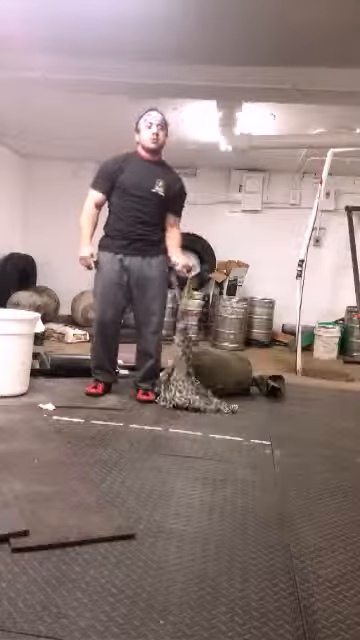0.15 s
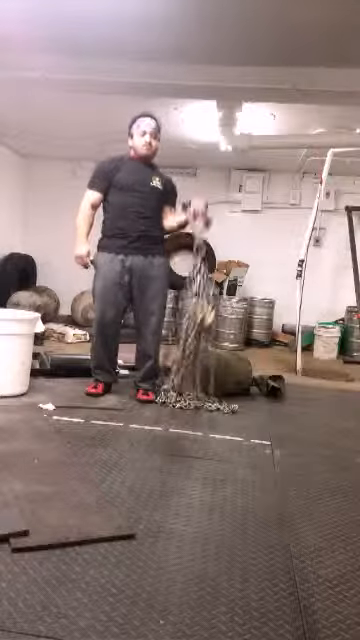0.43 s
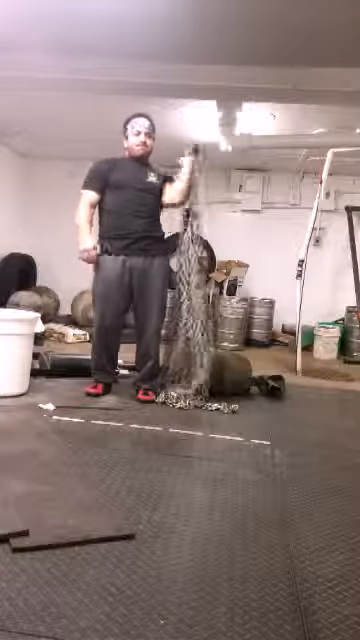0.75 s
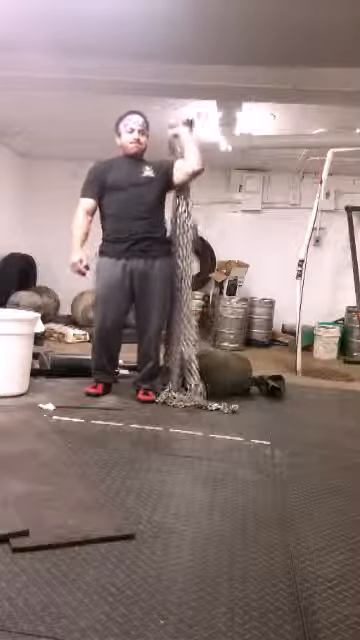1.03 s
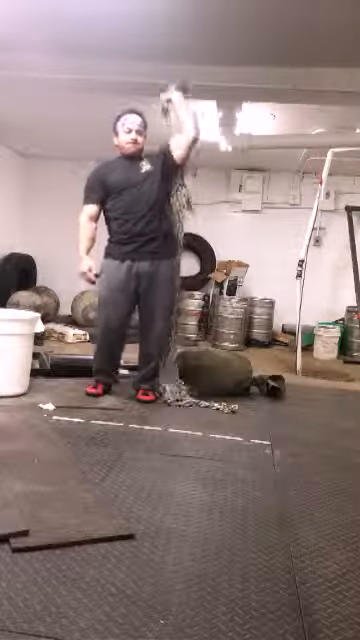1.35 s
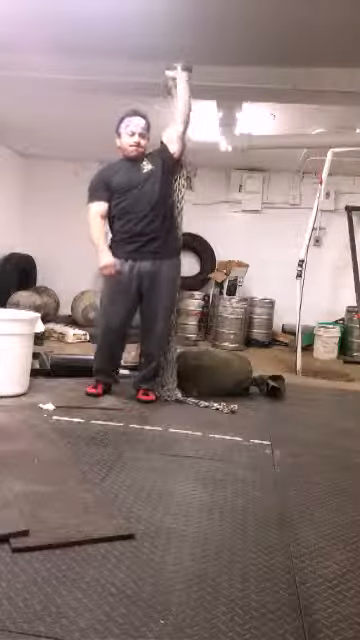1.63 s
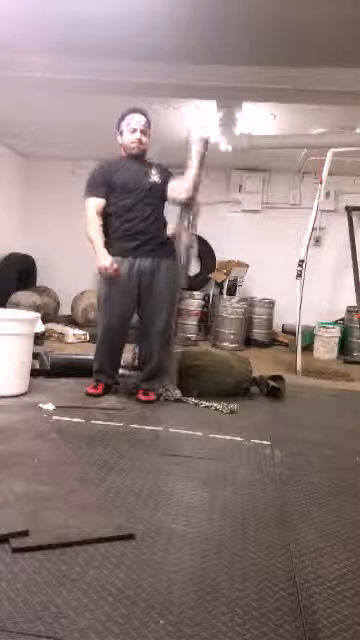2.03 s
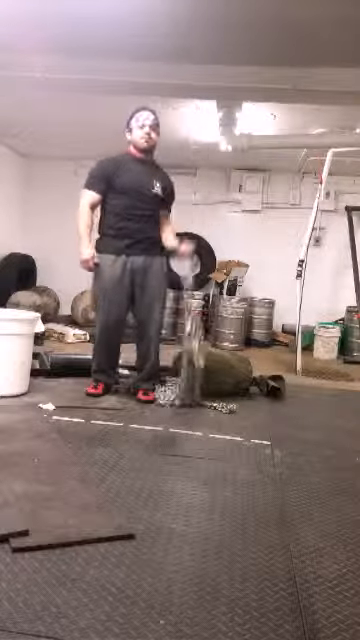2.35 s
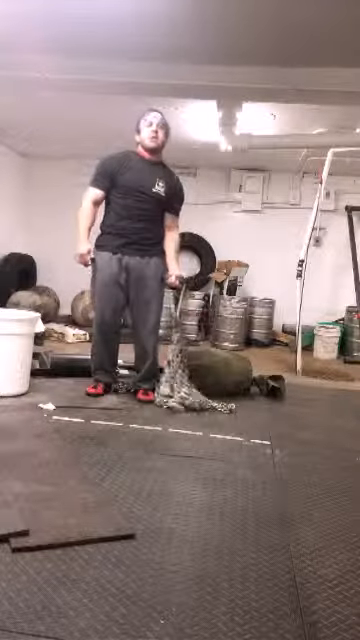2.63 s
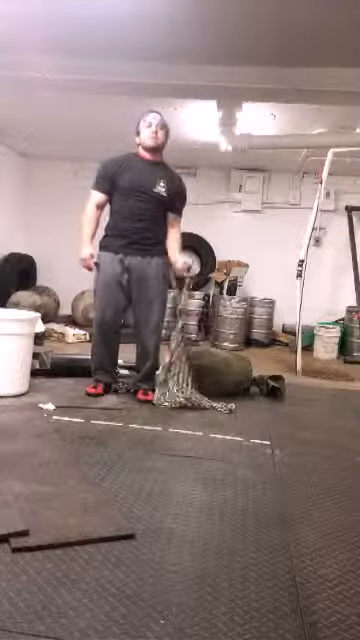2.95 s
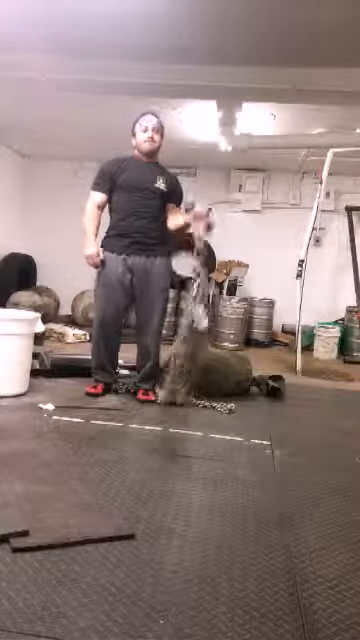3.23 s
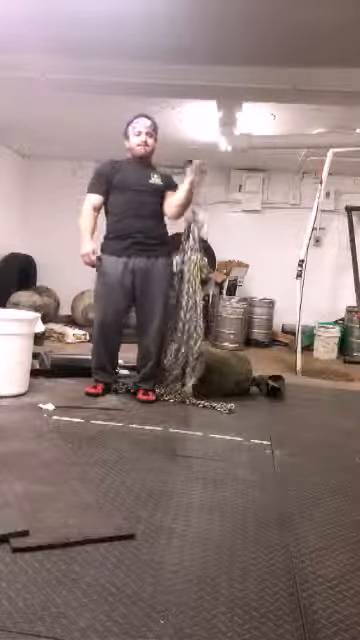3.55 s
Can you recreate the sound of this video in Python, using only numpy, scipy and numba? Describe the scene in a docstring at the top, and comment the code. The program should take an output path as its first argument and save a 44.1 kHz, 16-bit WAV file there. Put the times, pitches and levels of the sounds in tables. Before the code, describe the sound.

A thick bundle of chain links spills onto a rubber floor, falls nearly quiet, jingles loosely as it rises, drops back in a bright metallic crash, settles, and rattles once more in a low, hard-walled room.

```python
"""In a low, bare gym with a rubber floor, a bundle of heavy steel chains drops onto its pile, is lifted off,
shaken overhead and let down again; a short last rattle follows. Hundreds of link collisions a second each
give a dry tick and a high ring, with dull knocks from further impacts; strands slap and a few links snap.
The bundle lands with a low clang of decaying sines. The stereo pickup takes each source close or distant
by its share of the room's tail; the recorder softens quiet passages and cuts the extreme treble."""
import sys
import numpy as np
from scipy import signal
from scipy.fft import rfft, irfft, next_fast_len
from scipy.io import wavfile
from scipy.ndimage import uniform_filter1d
from numba import njit

SR = 44100
rng = np.random.default_rng(int(sys.argv[2]) if len(sys.argv) > 2 else 0)


def inscribe(sig):
    """Save sig as 16-bit PCM at rate SR to the path in sys.argv[1].

    A 1-D sig is mono; a 2-D sig holds one channel per row.
    Samples are clipped to [-1, 1] before scaling.
    """
    pcm = np.round(np.clip(np.atleast_2d(sig).T, -1, 1) * 32767)
    wavfile.write(sys.argv[1], SR, pcm.astype(np.int16))


N = 163170
T = np.arange(N) / SR
LINKS = 120  # different links to draw from
MAX_HITS = 20000
LN_60_DB = np.log(1000)  # a t60 is the time to fall by 60 dB


def undb(db):
    """Decibels to gain."""
    return 10 ** (np.asarray(db) / 20)


def unit(x):
    """Scale to rms 1."""
    return x / np.sqrt(np.mean(x ** 2))


def lookup(table, hz):
    """Read (f/Hz, value) points on a log-frequency axis."""
    f, value = np.array(table, float).T
    return np.interp(np.log(hz + 1e-9), np.log(f), value)


def colour(x, table):
    """Filter by (f/Hz, level/dB) points, without phase shift."""
    size = next_fast_len(N + 8192, True)
    gain = undb(lookup(table, np.fft.rfftfreq(size, 1 / SR)))
    return irfft(rfft(x, size) * gain, size)[..., :N]


def convolve(x, response):
    """Play x through a stereo response."""
    return signal.fftconvolve(np.atleast_2d(x), response, axes=-1)[:, :N]


def in_room(x, room, wet_db):
    """Direct sound plus reverberation at constant power; a higher wet_db sounds more distant."""
    wet = undb(wet_db)
    return (x + wet * convolve(x, room)) / np.hypot(1, wet)


def place(x, table):
    """Share the sound between left and right by (f/Hz, left minus right level/dB) points."""
    left = colour(x[0], [(hz, db / 2) for hz, db in table])
    right = colour(x[1], [(hz, -db / 2) for hz, db in table])
    return np.array([left, right])


def level_curve(times, db):
    """Gain that moves between dB points, and is silent outside them."""
    return undb(np.interp(T, times, db, left=-120, right=-120))


def effort(moves):
    """Gains of ring, tick and knock, summed over a list of movements."""
    tables = [np.array(move) for move in moves]
    return [sum(level_curve(m[:, 0], m[:, column]) for m in tables) for column in (1, 2, 3)]


def collisions(per_s, scatter_db):
    """Impacts at random times with scattered force, as rows (sample, force, which link 0-1)."""
    draws = rng.random((MAX_HITS, 3))
    times = np.cumsum(-np.log(1 - draws[:, 0])) / per_s
    force = undb(scatter_db * np.minimum(-np.log(1 - draws[:, 1]), np.pi))
    return np.column_stack([times * SR, force, draws[:, 2]])[times < N / SR]


# tick gain, before its trim, at which all links collide; least share that collides in quiet passages
BUSY_DB, IDLE_SHARE = -30, 0.32


def thinned(hits, gain):
    """As the chain slows, fewer links collide, and each stands out more."""
    gain_at_hit = gain[hits[:, 0].astype(int)]
    share = np.clip(np.sqrt(gain_at_hit / undb(BUSY_DB)), IDLE_SHARE, 1)
    kept = rng.random(MAX_HITS)[:len(hits)] < share
    return np.column_stack([hits[:, 0], hits[:, 1] / np.sqrt(share), hits[:, 2]])[kept]


@njit
def strike(hits, responses):
    """Every impact plays the stereo response of its link, scaled by its force."""
    out = np.zeros((2, N + responses.shape[2]))
    for start, force, link in hits:
        for c in range(2):
            response = responses[int(link * len(responses)), c]
            part = out[c, int(start):]
            for i in range(len(response)):
                part[i] += force * response[i]
    return out[:, :N]


CONTACT_RISE_S = 0.00034  # links slide into contact


def crack(hits, decay_s):
    """Each impact is a short noise burst whose shape differs from link to link and side to side."""
    t = T[:1024]
    envelope = np.exp(-t / decay_s) * (1 - np.exp(-t / CONTACT_RISE_S))
    return unit(strike(hits, rng.standard_normal((LINKS, 2, len(t))) * envelope))


def clink(hits, t60, count):
    """Touching links ring briefly at scattered pitches, mostly below the high ring."""
    t = T[:4096]
    hz = rng.uniform(1800, 12000, (count, LINKS, 1, 1))
    cycles = hz * t + rng.random((count, LINKS, 2, 1))
    tones = np.sin(2 * np.pi * cycles).sum(axis=0)
    return unit(strike(hits, tones * np.exp(-LN_60_DB * t / t60)))


# ringing modes of a link: f/Hz
LINK_HZ = [12910, 13340, 13790, 14110, 14430, 15130]
# the same modes: spread between links f/Hz, relative level/dB, t60 t/s at a damping of 1
LINK_MODES = [(34, -4, 0.1), (99, -0.5, 0.043), (66.6, -3, 0.078), (98, -3, 0.026), (99, -0.5, 0.063),
              (122, -11.5, 0.042)]
RING_ATTACK_S = 0.00052


def ring(hits, damping):
    """Each link rings on its own slightly shifted set of modes; damping scales the rate of decay."""
    t, responses = T[:3072], 0
    attack = 1 - np.exp(-t / RING_ATTACK_S)
    for hz, (spread, db, t60) in zip(LINK_HZ, LINK_MODES):
        own_hz = hz + spread * rng.standard_normal((LINKS, 1, 1))
        decay = np.exp(-LN_60_DB * t * damping / t60)
        envelope = undb(db) / np.sqrt(t60) * decay * attack
        cycles = own_hz * t + rng.random((LINKS, 2, 1))
        responses = responses + envelope * np.sin(2 * np.pi * cycles)
    return unit(strike(hits, responses))


# reverberation: f/Hz, t60 t/s
ROOM_T60 = [(60, 0.16), (200, 0.44), (550, 0.89), (1400, 0.3), (4000, 1), (6000, 0.69), (8500, 0.39),
            (14000, 0.32)]
ROOM_ONSET_S = .005  # gap before the tail


def room_response():
    """A diffuse stereo tail of noise bands, longest around 550 Hz and 4 kHz."""
    t, hz, out = T[:SR], np.arange(SR // 2 + 1), 0
    noise = rfft(rng.standard_normal((2, SR)))
    for f, t60 in ROOM_T60:
        share = lookup([(g, float(g == f)) for g, _ in ROOM_T60], hz)
        decay = np.exp(-LN_60_DB * t / t60)
        out = out + irfft(noise * share, SR) * decay * np.sqrt(2 * LN_60_DB / t60 / SR)
    return out * (t > ROOM_ONSET_S)


# colour of the room air: f/Hz, relative level/dB
AIR_COLOUR = [(60, -4), (200, 4), (600, -1), (1500, -15.5), (5000, -9), (14000, -29.5)]
AIR_DB = -84


def room_air():
    """Faint steady noise of the bare room."""
    return undb(AIR_DB) * unit(colour(rng.standard_normal((2, N)), AIR_COLOUR))


# links pour onto the pile and settle: t/s, then ring, tick and knock level/dB before trims
POURS = [
    [(-.01, -4, -10.5, -23.5), (.05, -15.5, -16, -28), (.1, -12, -16.5, -22.5), (.206, -15.5, -26, -35.5),
     (.338, -31, -42.5, -49), (.45, -70, -72, -41.5), (.53, -68, -68, -49.5), (.57, -54, -74, -66)],
    [(2.27, -48, -42, -52), (2.297, -24, -34.5, -42), (2.344, -11, -21, -25.5), (2.472, -7, -14.5, -26),
     (2.582, -9.5, -13, -25), (2.716, -9.5, -12, -28), (2.86, -12, -14.5, -23.5),
     (2.932, -12.5, -19.5, -27), (3.006, -18, -30, -34.5), (3.13, -36, -46, -37.5), (3.24, -62, -75, -42.5),
     (3.34, -62.5, -74, -44.5), (3.38, -81, -93, -85)],
]
# colour of contacts on the pile: f/Hz, relative level/dB
POUR_TICK = [(50, -38), (110, -21.5), (200, -3.5), (400, 0.5), (950, -2.5), (1300, 0), (1750, -2.5),
             (2500, -6), (3600, -2), (4300, 0), (4900, -1.5), (6100, 2), (7600, -1), (9800, 2),
             (11700, -2.5), (15500, -1)]
# colour of the dull knock on the floor: f/Hz, relative level/dB
POUR_KNOCK = [(70, -48), (130, -30), (220, -12), (340, -1), (500, 1.5), (720, 2.5), (1000, -6.5),
              (1500, -16.5), (3000, -42)]
# left minus right for sounds at the pile: f/Hz, level/dB
POUR_PAN = [(105, 7.5), (390, -3), (690, -6.5), (1290, 2.5), (2380, 4.5), (4300, 0), (8000, 2.3),
            (11600, -6.5), (12800, 4.5), (15100, 3)]


def piling_chain(room):
    """Links crash onto the heap: denser, harder and more damped than when hanging."""
    ringing, ticking, knocking = effort(POURS)
    hits = thinned(collisions(per_s=2000, scatter_db=3.5), ticking)
    rings = undb(0.5) * ringing * ring(hits, damping=0.75)
    contact = crack(hits, decay_s=0.0013) + undb(-2.5) * clink(hits, t60=0.11, count=3)
    ticks = undb(3.0) * ticking * unit(colour(contact, POUR_TICK))
    thuds = crack(collisions(per_s=450, scatter_db=3.0), decay_s=0.007)
    knocks = undb(1.0) * knocking * unit(colour(thuds, POUR_KNOCK))
    bright = in_room(rings + ticks, room, wet_db=-5.5)
    return place(bright + in_room(knocks, room, wet_db=-2.0), POUR_PAN)


# weight of links bumping on the floor: t/s, level/dB before a trim
BUMPS = [(0, -32), (.15, -38.5), (.25, -54), (.33, -83), (.62, -71), (.68, -55), (.78, -46), (1.0, -55),
         (1.08, -66), (1.3, -73), (1.38, -54), (1.52, -57.5), (1.7, -51), (1.95, -55), (2.28, -50),
         (2.38, -34.5), (2.7, -27.5), (2.9, -33.5), (3.03, -51), (3.12, -69.5), (3.49, -69), (3.56, -44),
         (3.7, -47)]
# colour of the bumps: f/Hz, relative level/dB
BUMP_COLOUR = [(25, -7.5), (55, -4.5), (90, -1), (150, -1.5), (260, -5), (400, -23.5), (800, -39)]


def bumps(room):
    """Links that drop on the rubber floor thump dully: short bursts with the treble filtered away."""
    times, db = np.array(BUMPS).T
    hits = collisions(per_s=220, scatter_db=1.5)
    thumps = unit(colour(crack(hits, decay_s=0.0032), BUMP_COLOUR))
    level = undb(np.interp(T, times, db) - 0.5)
    return place(in_room(level * thumps, room, wet_db=-8.5), POUR_PAN)


# whole strands slap together: t/s, level/dB before a trim, f/Hz
CLANKS = [(.321, -34, 569), (.527, -41, 570), (.773, -40, 715), (.849, -37.5, 656), (.999, -35.5, 506),
          (1.096, -44, 796), (1.15, -42, 645), (1.26, -38, 785), (1.31, -37.5, 695), (1.358, -34, 655),
          (1.547, -36.5, 448), (1.644, -39.5, 456), (1.709, -39, 412), (1.765, -34.5, 480),
          (1.903, -40.5, 416), (2.032, -33.5, 437), (2.085, -40.5, 624), (2.385, -31.5, 730),
          (2.56, -19, 705), (2.655, -23.5, 509), (2.885, -27, 510), (3.23, -41, 498), (3.508, -44, 710),
          (3.575, -38, 663)]
# broad part of a slap: f/Hz, level/dB before CLANK_BROAD_DB
CLANK_BODY = [(40, -22.5), (200, -2.5), (900, 0), (1400, -9), (2500, 20), (5000, -13)]
CLANK_TRIM_DB, CLANK_BROAD_DB, CLANK_CLUSTER_DB = -1, -35, 0  # the cluster is the rattle beside the note
CLANK_RISE_S, CLANK_T60_S = 0.0025, 0.2  # time to make contact; decay by 60 dB
CLANK_WIDTH_HZ = 70  # half width of the cluster's peak at half amplitude
# left minus right for lifted strands: f/Hz, level/dB
LIFT_PAN = [(105, 16), (390, 4), (690, -6.5), (1290, 12), (2380, 4), (4300, -1.2), (8000, 2), (11600, -4.5),
            (12800, 9.5), (15100, 9.5)]


def clanks(room):
    """Strands slap together: a hollow note inside a quick cluster of knocks, made as shaped noise."""
    t, out = T[:8192], np.zeros((2, N + 8192))
    f = np.fft.rfftfreq(len(t), 1 / SR)
    envelope = (1 - np.exp(-t / CLANK_RISE_S)) * np.exp(-LN_60_DB * t / CLANK_T60_S)
    broad = undb(CLANK_BROAD_DB + lookup(CLANK_BODY, f))
    for start, db, hz in CLANKS:
        shape = 1 / (1 + ((f - hz) / CLANK_WIDTH_HZ) ** 2) + broad
        cluster = unit(irfft(rfft(rng.standard_normal((2, len(t)))) * shape))
        note = np.sqrt(2) * np.sin(2 * np.pi * hz * t + np.pi * rng.random((2, 1)))
        slap = (note + undb(CLANK_CLUSTER_DB) * cluster) * envelope
        i = int(start * SR)
        out[:, i:i + len(t)] += undb(db + CLANK_TRIM_DB) * slap
    return place(in_room(out[:, :N], room, wet_db=-5.5), LIFT_PAN)


# hanging strands jostle while lifted: t/s, then ring, tick and knock level/dB before trims
LIFTS = [
    [(.57, -70, -70, -71), (.62, -59, -54.5, -69), (.646, -34, -37.5, -53), (.68, -24, -33, -46),
     (.77, -17.5, -27, -39.5), (.87, -22.5, -30.5, -44.5), (1.0, -22, -31.5, -40.5),
     (1.09, -25, -32.5, -50.5), (1.19, -23, -31.5, -44.5), (1.25, -29, -36.5, -66),
     (1.38, -24.5, -30.5, -41.5), (1.49, -27, -34.5, -50), (1.58, -21.5, -31.5, -42),
     (1.7, -15, -25.5, -40.5), (1.9, -21.5, -29.5, -43), (2.0, -35, -37, -52), (2.06, -50, -56, -47.5),
     (2.15, -52, -60, -46), (2.26, -46, -36.5, -49), (2.32, -39, -29, -40)],
    [(3.38, -77, -69.5, -75.5), (3.435, -56, -57, -57.5), (3.485, -54, -44.5, -64), (3.515, -20, -28, -43),
     (3.574, -20, -25.5, -42.5), (3.65, -17, -27, -42), (3.71, -29, -40, -48)],
]
# colour of contacts between hanging links: f/Hz, relative level/dB
LIFT_TICK = [(100, -12), (200, -10.5), (400, -4.5), (950, -3.5), (1300, -15.5), (1750, -11), (2300, -7.5),
             (3300, -1), (4300, 1), (5800, 0), (7300, -4), (9800, 0.5), (12000, -3), (15500, -15)]
# colour of the dull knock while hanging: f/Hz, relative level/dB
LIFT_KNOCK = [(120, -34), (220, -3.5), (320, -1.5), (480, 2.5), (720, 1), (1000, -9), (1500, -25),
              (3000, -51)]


def hanging_chain(room):
    """Free links jostle lightly and ring on, while separate impacts knock dully."""
    ringing, ticking, knocking = effort(LIFTS)
    hits = thinned(collisions(per_s=1100, scatter_db=3.5), ticking)
    rings = undb(1.5) * ringing * ring(hits, damping=0.64)
    contact = crack(hits, decay_s=0.0024) + undb(-1.5) * clink(hits, t60=0.1, count=3)
    ticks = undb(2.0) * ticking * unit(colour(contact, LIFT_TICK))
    thuds = crack(collisions(per_s=260, scatter_db=3.0), decay_s=0.005)
    knocks = undb(3.0) * knocking * unit(colour(thuds, LIFT_KNOCK))
    bright = in_room(rings + ticks, room, wet_db=1.5)
    return place(bright + in_room(knocks, room, wet_db=1.5), LIFT_PAN)


# a few links snap taut or strike hard, clear of the rattle: t/s, ring and tick level/dB before trims
SNAPS = [(.644, -30, -45), (0.706, -22, -43), (.921, -15.5, -34), (1.12, -25, -35), (1.335, -22, -35),
         (1.407, -20, -31.5), (1.56, -17, -25), (1.611, -24, -36), (1.682, -14, -24), (1.807, -12, -24.5),
         (1.891, -13, -36), (2.288, -15, -27.5), (2.324, -9, -18.5), (2.699, -12, -18.5), (2.831, -17, -13),
         (3.173, -37, -46.5), (3.232, -49.5, -60), (3.325, -53, -56), (3.51, -24, -36.5)]
SNAP_REBOUND_S, SNAP_LOSS_DB = .005, 1  # mean time between rebounds, loss at each


def rebounds(column, count):
    """Each snap as a run of weakening impacts, rows (sample, force, which link 0-1)."""
    rows, draws = np.array(SNAPS), rng.random((len(SNAPS), 2, count))
    gaps = 2 * SNAP_REBOUND_S * draws[:, 0]
    times = rows[:, :1] + np.cumsum(gaps, axis=1) - gaps
    force = undb(rows[:, [column]] - SNAP_LOSS_DB * np.arange(count))
    return np.column_stack([times.ravel() * SR, force.ravel(), draws[:, 1].ravel()])


def snaps(room):
    """Hard single strikes rebound a few times, each with a high ring and a lower clink."""
    high, low = rebounds(1, count=4), rebounds(2, count=4)
    # the norm of the forces restores the levels that rms scaling takes away
    rings = undb(-33) * np.linalg.norm(high[:, 1]) * ring(high, damping=0.47)
    contact = clink(low, t60=0.14, count=5) + undb(-13.5) * crack(low, decay_s=0.0012)
    ticks = undb(-29.5) * np.linalg.norm(low[:, 1]) * unit(colour(contact, LIFT_TICK))
    return place(in_room(rings + ticks, room, wet_db=0.5), LIFT_PAN)


# strands scrape over the floor as they leave it: t/s, level/dB
DRAG = [(.7, -66), (.775, -34.5), (.86, -52.5), (1.03, -56), (1.2, -79)]
# colour of the scrape: f/Hz, relative level/dB
DRAG_COLOUR = [(60, -17), (250, -3), (700, 1.5), (1300, 1.5), (2200, -3), (3500, -20), (8000, -25)]


def drag(room):
    """Links slide off the pile and clatter over the floor: uneven bursts, heard close."""
    times, db = np.array(DRAG).T
    hits = collisions(per_s=270, scatter_db=7.5)
    clatter = unit(colour(crack(hits, decay_s=0.0059), DRAG_COLOUR))
    return place(in_room(level_curve(times, db) * clatter, room, wet_db=-15.5), LIFT_PAN)


# the lower part of the sound dips briefly: t/s, half length t/s, depth level/dB, below f/Hz
DIPS = [(1.07, 0.017, 8, 2200), (1.134, 0.013, 9, 2600), (1.242, 0.0095, 23, 2570), (1.957, 0.017, 7, 2400)]


def dipped(x):
    """The lower part of the sound drops away for moments, along bell-shaped dB curves."""
    for at, half_s, depth_db, hz in DIPS:
        low = signal.sosfiltfilt(signal.butter(4, hz, fs=SR, output="sos"), x)
        dip_db = -depth_db * np.exp(-((T - at) / half_s) ** 2)
        x = x - low * (1 - undb(dip_db))
    return x


# the bundle lands: t/s, level/dB
LANDINGS = [(2.306, -23.5), (2.334, -9.5), (2.475, -17)]
# what the blow rings with: f/Hz, relative level/dB, t60 t/s
THUD_MODES = [(406.7, -1.5, .33), (448.5, -9, 0.65), (522, -14, 0.55), (106.4, -38, .17)]
THUD_RISE_S = 0.0028


def landing(room):
    """The weight of the bundle lands with a low clang: a few decaying modes per blow."""
    out = np.zeros(N)
    for start, db in LANDINGS:
        t = np.maximum(T - start, 0)
        rise = 1 - np.exp(-t / THUD_RISE_S)
        for hz, mode_db, t60 in THUD_MODES:
            decay = np.exp(-LN_60_DB * t / t60)
            out += rise * undb(db + mode_db) * np.sin(2 * np.pi * hz * t) * decay
    return place(in_room(out, room, wet_db=-1.5), POUR_PAN)


def scene():
    """Pile, bumps, slaps, hanging chain, snaps, drag and landing, over the faint air of the room."""
    room = room_response()
    air = room_air()
    on_floor = piling_chain(room) + bumps(room) + drag(room) + landing(room)
    lifted = clanks(room) + hanging_chain(room) + snaps(room)
    return dipped(on_floor + lifted) + air


GATE_DB, GATE_KNEE_DB, GATE_DEPTH_DB = -44.5, 2.5, 6  # threshold, knee below it, greatest reduction
GATE_S = 0.027  # length of the level average
TOP_HZ = 15720


def record(dry):
    """The recorder turns quiet passages down, clips at full scale and cuts the top."""
    power = uniform_filter1d(np.mean(dry ** 2, axis=0), int(GATE_S * SR))
    level_db = 10 * np.log10(np.abs(power) + 1e-12)
    gate = undb(-GATE_DEPTH_DB * np.clip((GATE_DB - level_db) / GATE_KNEE_DB, 0, 1))
    top_cut = signal.ellip(10, .2, 70, TOP_HZ, fs=SR, output="sos")
    return signal.sosfilt(top_cut, np.clip(gate * dry, -1, 1))


dry = scene()
out = record(dry)
inscribe(out)
```